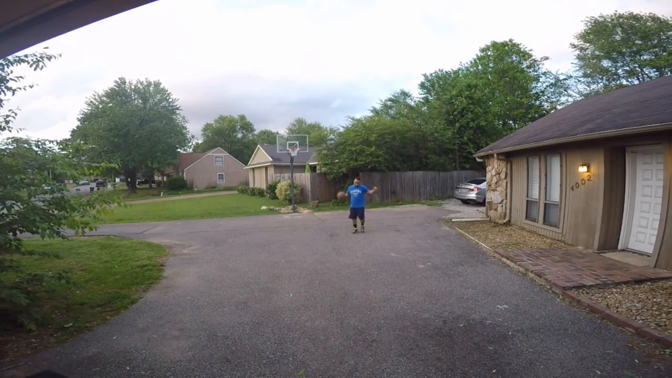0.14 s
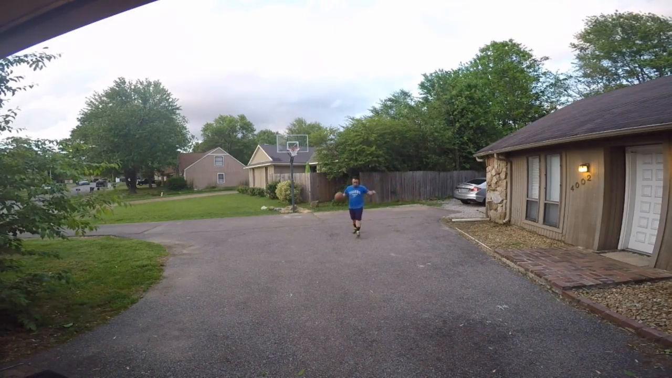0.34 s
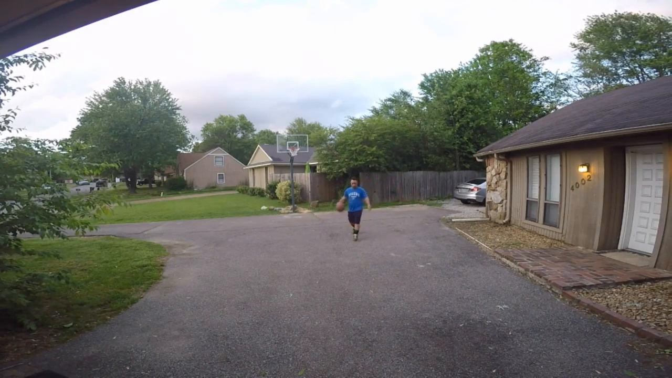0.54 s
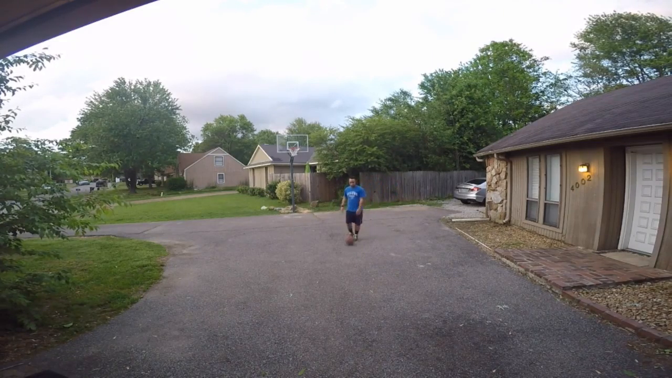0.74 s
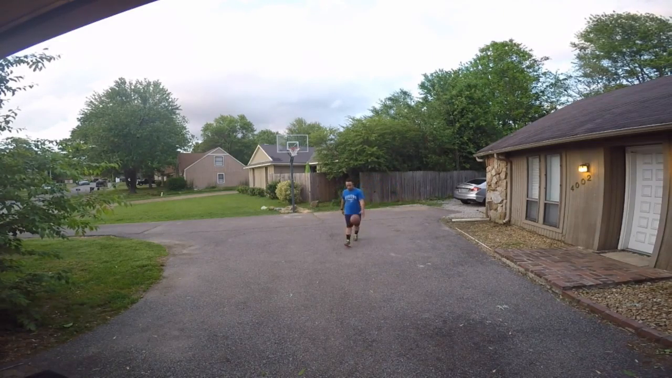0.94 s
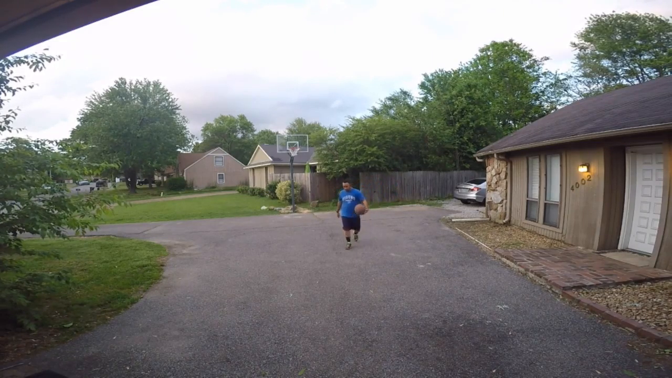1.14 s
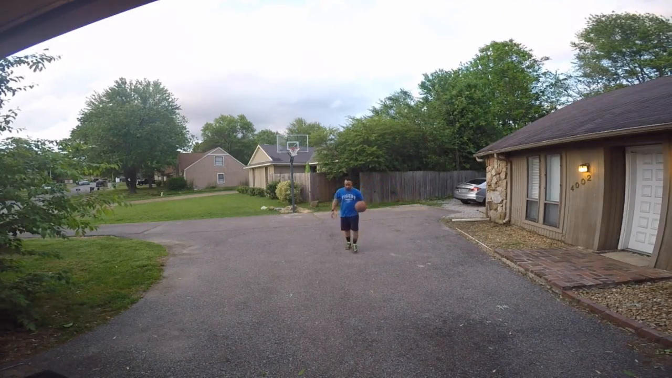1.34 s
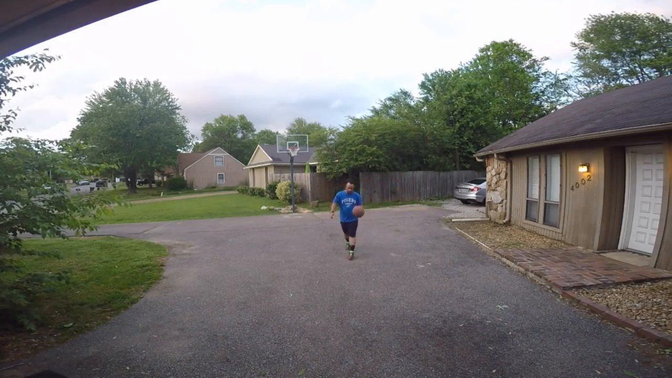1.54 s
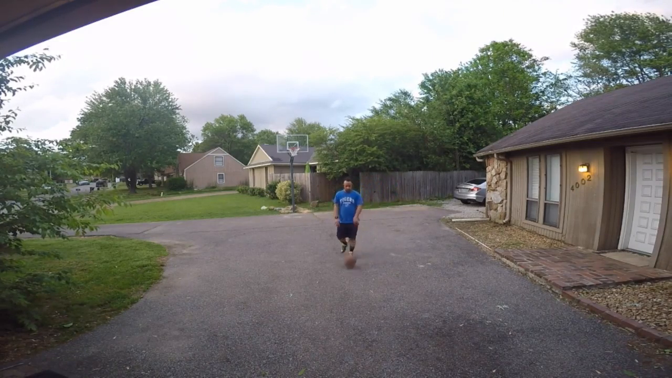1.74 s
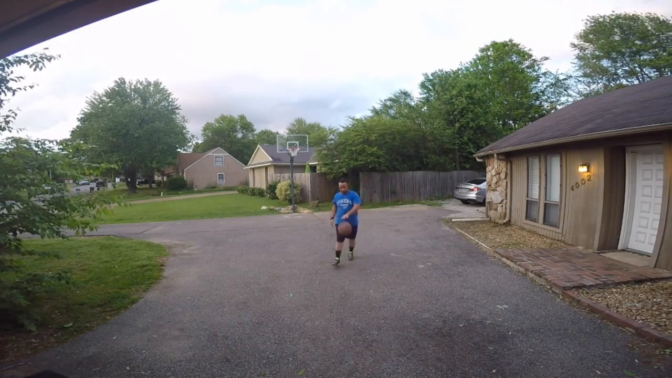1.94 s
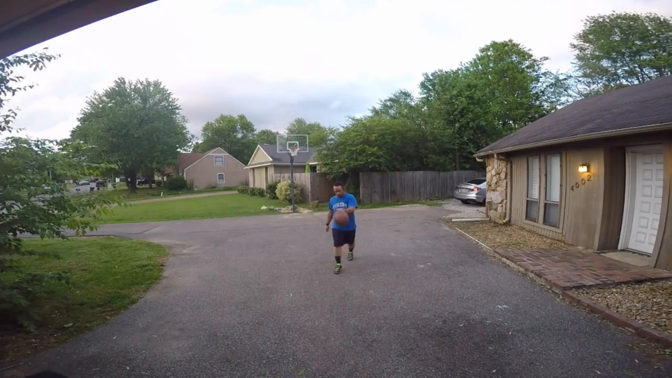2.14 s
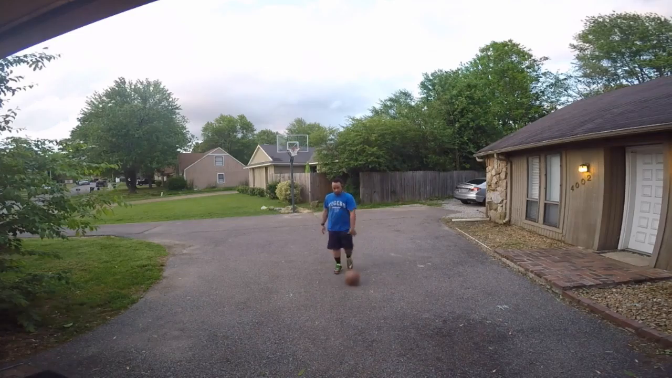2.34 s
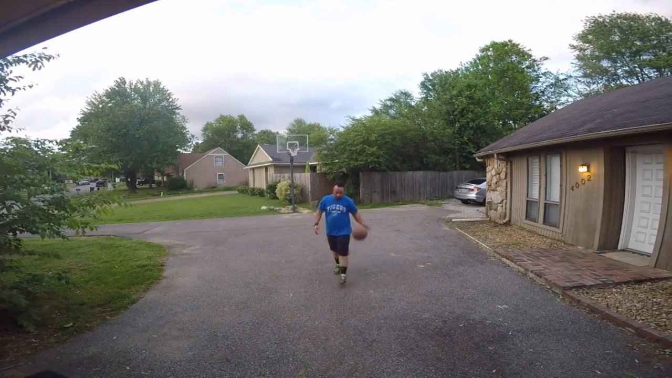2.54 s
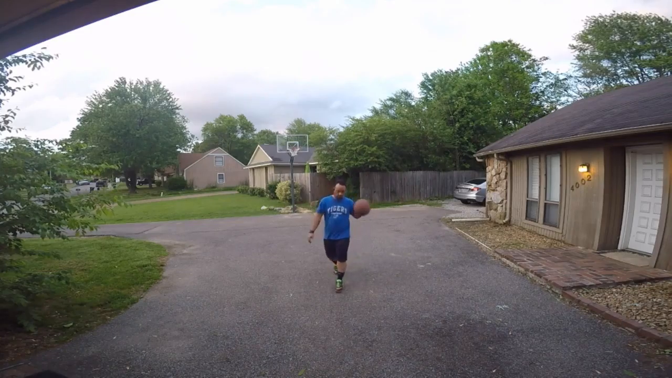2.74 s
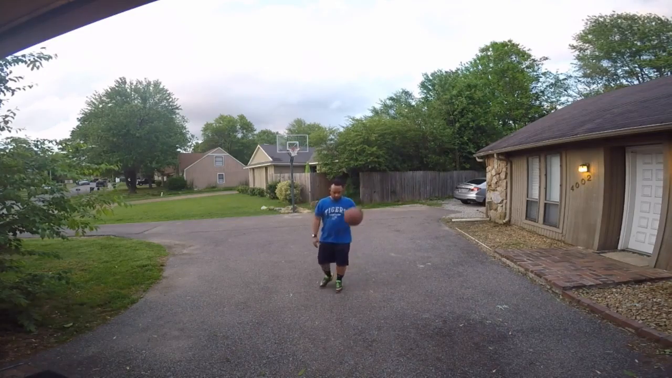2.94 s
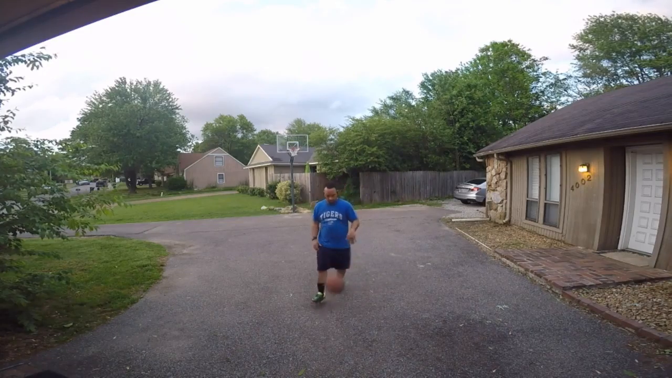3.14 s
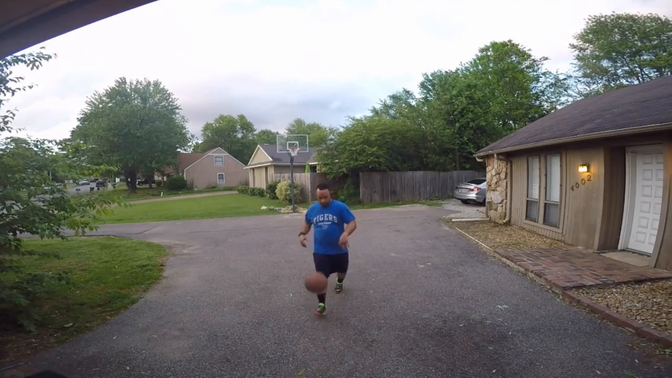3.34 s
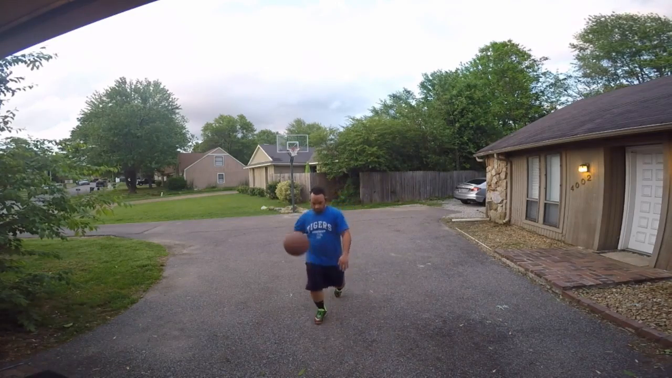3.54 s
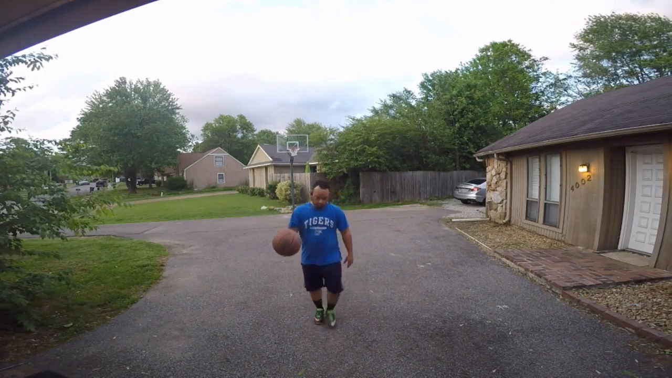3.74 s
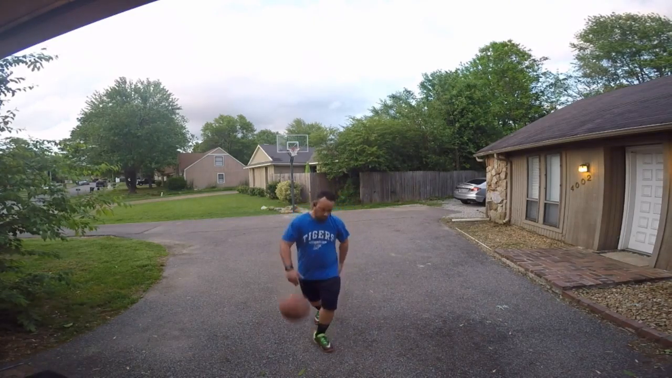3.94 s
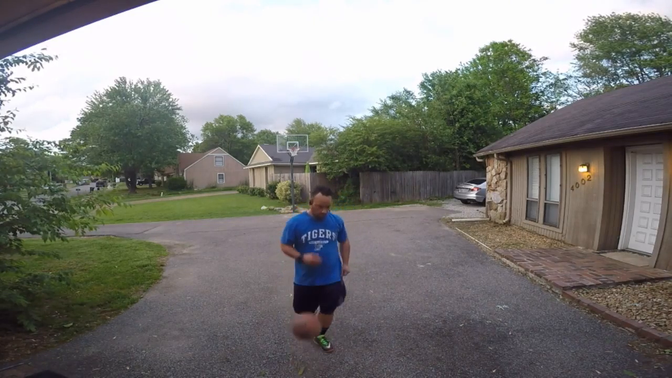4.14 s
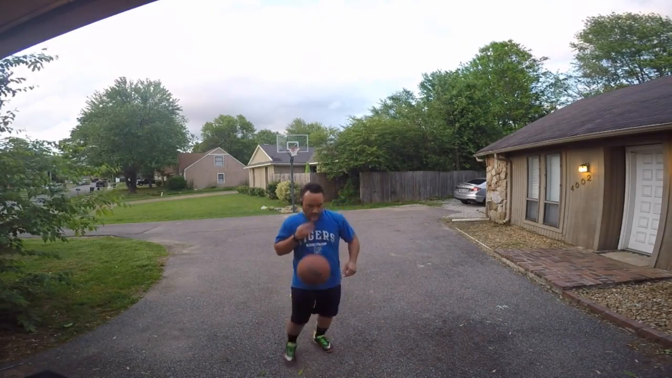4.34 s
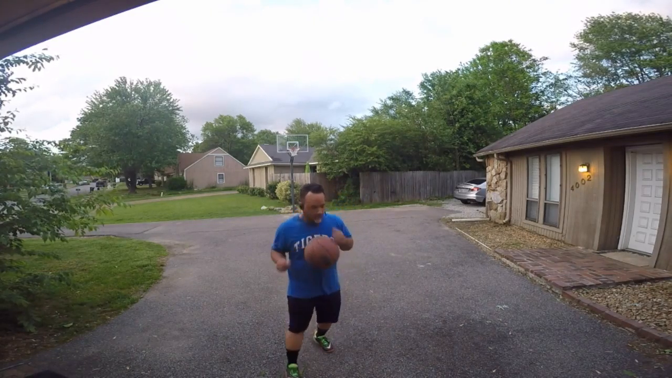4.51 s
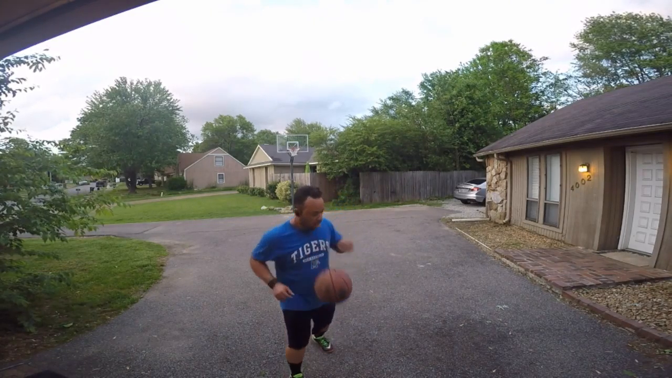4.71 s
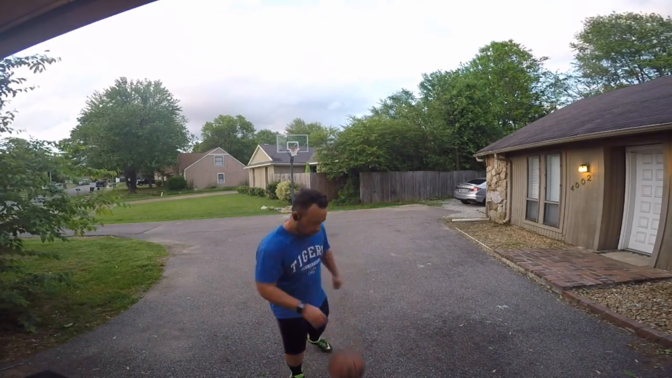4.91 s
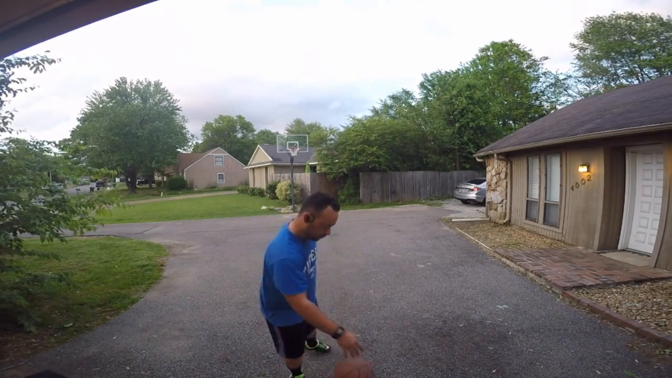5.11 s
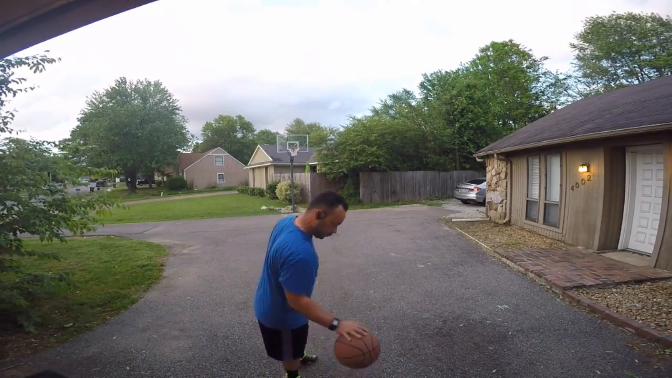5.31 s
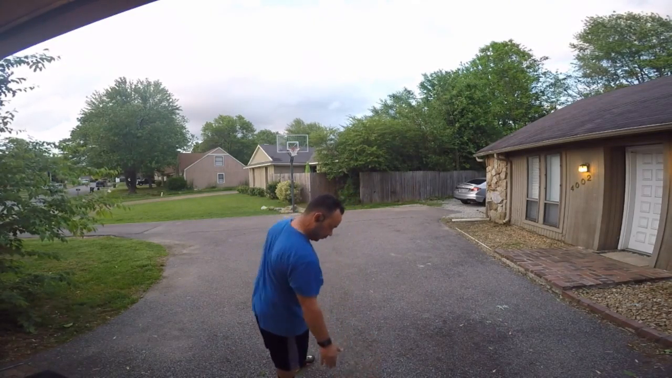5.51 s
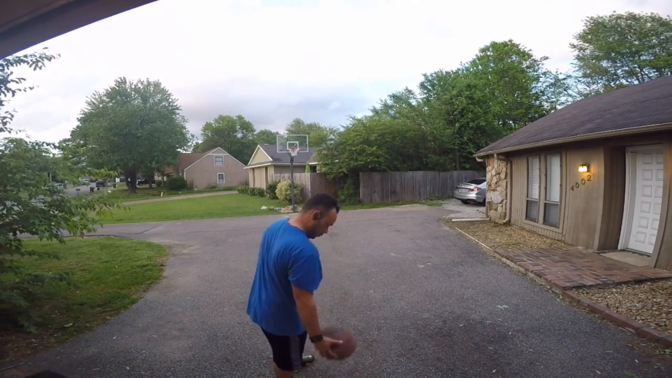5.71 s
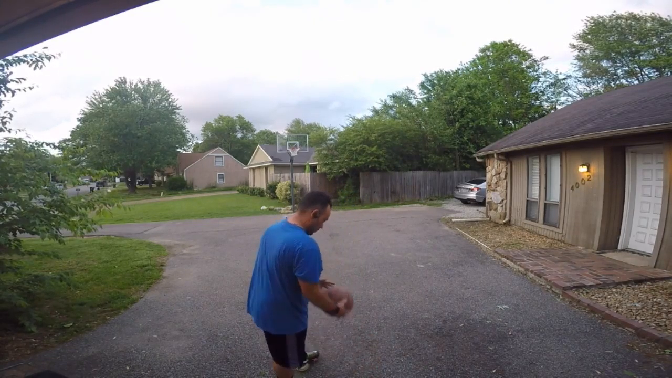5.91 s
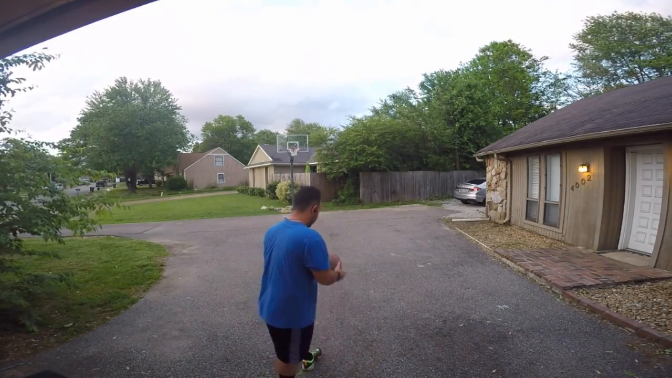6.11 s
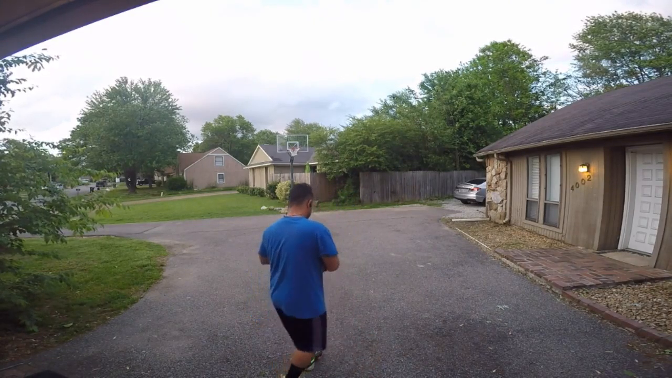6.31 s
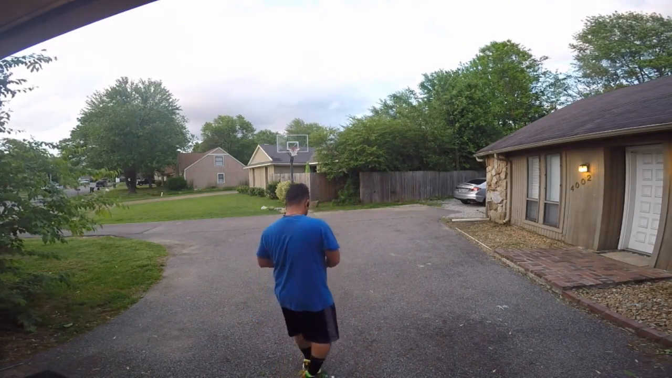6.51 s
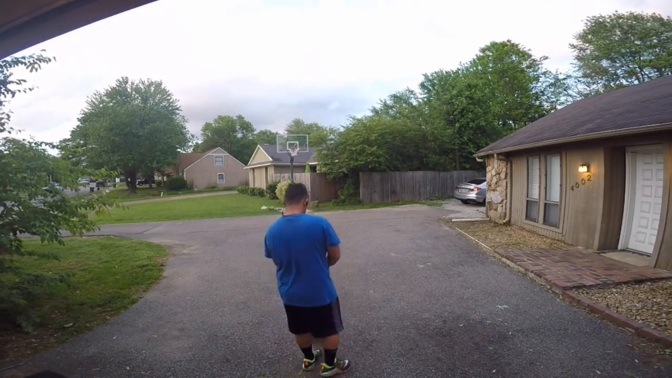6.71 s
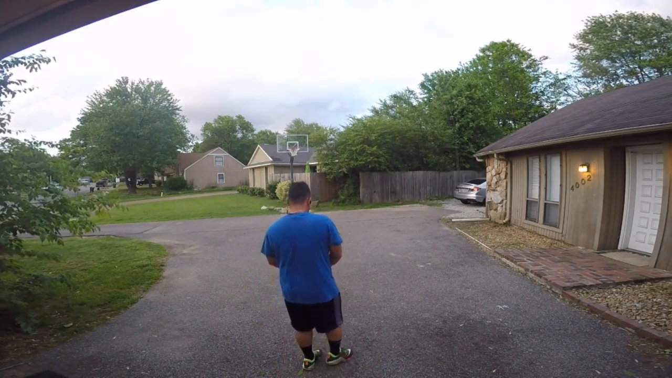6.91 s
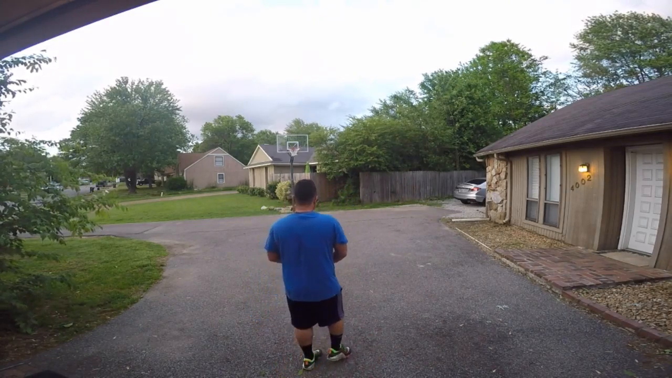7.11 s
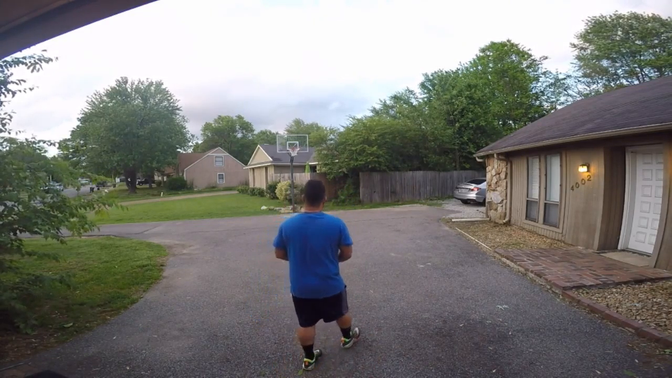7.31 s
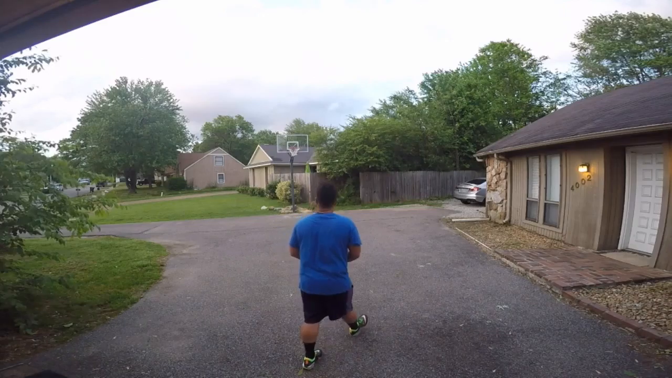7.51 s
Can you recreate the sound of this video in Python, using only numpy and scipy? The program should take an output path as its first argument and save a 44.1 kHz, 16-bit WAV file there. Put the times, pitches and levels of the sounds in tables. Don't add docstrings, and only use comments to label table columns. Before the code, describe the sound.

A quiet driveway between houses, heard through a small housed microphone with a boxy midrange colour. Low traffic and leaf murmur sways throughout, with faint hiss. A light tap comes at 0.26 s, then a dull, distant basketball bounce at 0.8. A medium slap lands at 1.8, the loudest at 2.4, a gritty medium one at 3.3, and a loud one at 4.1. At 5.1 the bounce is loud, bright and gritty; at 5.6 it is weak. Each gives a very short skin ring, a hollow air ring, a low push booming in door panels, and quick echoes decaying around the yard. Small shoe taps fall between, with a sole drag at 5.4 and shuffles around 6.0 to 6.6. A high insect ticks in short bursts until about 6.2; faint birds call near 2.4, 2.9 and 4.5 to 4.9. A final narrow-toned slap at 6.8 echoes clearly, then a step at 7.0 and fading ambience.

```python
import sys
import numpy as np
from scipy import signal
from scipy.fft import rfft, irfft
from scipy.io import wavfile

SR = 44100
rng = np.random.default_rng(int(sys.argv[2]) if len(sys.argv) > 2 else 0)


def invert_db(level):
    return 10 ** (np.asarray(level, dtype=float) / 20)


def persist_wave(psi):
    counts = np.round(np.clip(psi, -1, 1) * 32767).astype(np.int16)
    wavfile.write(sys.argv[1], SR, np.atleast_2d(counts).T)


N = 337806

# (time
# [s], slap level [dB], centre pitch [Hz], fall [dB per octave], grit level [dB])
BOUNCES = [
    (0.8243, -33.5, 1700, -2.5, -38),
    (1.8289, -20.5, 2170, 10.5, -34.5),
    (2.421, -13.5, 1730, 11.5, -38.5),
    (3.2903, -21, 1920, 7.5, -31.5),
    (4.1205, -15, 2100, 9, -32),
    (5.0642, -15.5, 2960, 8, -31),
    (5.5699, -30.5, 2300, -9, -37.5),
    (6.802, -20, 2780, 29, -33),
]
# (push level [dB], thud level [dB], yard echo under the slap [dB], first wall under the slap [dB])
THUMPS = [(-29.5, -27.5, -16, -18), (-26, -23.5, -21.5, -16.5), (-24, -24.5, -23.5, -19),
          (-24, -24, -21, -23), (-26, -23, -29, -19), (-29.5, -22, -22, -19), (-31, -23.5, -18, -20),
          (-27.5, -23.5, -12.5, -11)]
# (low ring level [dB], low ring [Hz], high ring [Hz], high ring level [dB], crackle level [dB])
SKIN = [(-28, 2023, 3900, -25, -57), (-24, 1920, 2590, -29, -44.5), (-13, 1750, 2770, -17, -46),
        (-21.5, 1850, 3980, -23.5, -43.5), (-16, 1680, 3920, -20, -43.5), (-35, 1800, 3790, -16, -62),
        (-31.5, 1600, 2820, -29, -50), (-25.5, 1300, 3270, -23, -36.5)]
# (lower edge [Hz], upper edge [Hz])
ZONES_HZ = [(1400, 2300), (2150, 3400), (3400, 4700), (4400, 6800), (500, 1450), (6500, 10500)]


def rms_one(x):
    return x / np.sqrt(np.mean(x ** 2) + 1e-20)


def clicks(times, sizes):
    out = np.full(N, 1e-18)
    places = np.minimum((np.asarray(times) * SR).astype(int), N - 1)
    np.add.at(out, places, sizes)
    return out


def fade(x, t60):
    return signal.lfilter([1], [1, -invert_db(-60 / (t60 * SR))], x)


def ring(x, hz, t60):
    r, w = invert_db(-60 / (t60 * SR)), 2 * np.pi * hz / SR
    return signal.lfilter([0, np.sin(w)], [1, -2 * r * np.cos(w), r * r], x)


def resonate(x, peaks):
    out = 0
    for k, (hz, width, level_db) in enumerate(peaks):
        r = np.exp(-np.pi * width / SR)
        b = (1 - r * r) / 2 * np.array([1, 0, -1])
        a = [1, -2 * r * np.cos(2 * np.pi * hz / SR), r * r]
        out = out + (-1) ** k * invert_db(level_db) * signal.lfilter(b, a, x)
    return out


def drift(rate):
    r = np.exp(-40 * np.pi * rate / SR)
    noise = rng.standard_normal(N // 20 + 4002)
    slow = signal.lfilter([1], [1, -2 * r, r * r], noise)[4000:]
    return np.interp(np.arange(N) / 20, np.arange(len(slow)), rms_one(slow))


def hump(level_db, centre_hz, fall_db, zones):
    middle = np.sqrt(np.prod(ZONES_HZ, axis=1))[zones, None]
    return level_db - fall_db * np.abs(np.log2(middle / centre_hz))


def housed(envelopes, strikes, grit_db):
    # (pitch [Hz], width [Hz], level [dB])
    housing = [(1650, 167, -1), (2012, 78, -2), (2480, 485, -3), (2820, 245, 0), (3214, 190, -2.5),
               (3735, 107, 3), (3950, 170, 0.5), (4590, 98, -20), (7200, 790, -23)]
    out = 0
    for zone, envelope, strike in zip(ZONES_HZ, envelopes, strikes):
        grit = rms_one(rng.standard_normal(N) * invert_db(grit_db * rng.standard_normal(N)))
        band = signal.butter(2, zone, "band", fs=SR, output="sos")
        both = signal.sosfilt(band, [grit, grit * envelope + strike])
        leak = invert_db(-17) * signal.lfilter([.3], [1, -.7], both)
        both = resonate(both, housing) + leak
        out = out + both[1] / np.std(both[0])
    return out


def background():
    # (pitch [Hz], level [dB per Hz])
    colour = [(15, -32), (25, 5), (59, 1), (225, -15.5), (1100, -23.5), (1390, -24), (1590, -17.5),
              (1870, -21), (3030, -24.5), (3860, -22.5), (8180, -32.5), (9610, -31), (10400, -33),
              (14000, -33.5), (15200, -35)]
    # (pitch [Hz], width [Hz], level [dB])
    hums = [(64, 21, -70), (9540, 120, -88), (14100, 300, -90)]
    hz = np.maximum(np.fft.rfftfreq(N, 1 / SR), 1)
    point_hz, point_db = np.transpose(colour)
    colour_db = np.interp(np.log(hz), np.log(point_hz), point_db)
    wide = rfft(rng.standard_normal(N)) * invert_db(colour_db)
    low = 1 / (1 + (hz / 150) ** 2)
    lows = irfft(wide * low, N) * invert_db(1.8 * drift(5.7))
    highs = irfft(wide * (1 - low), N) * invert_db(0.26 * drift(1.0))
    out = invert_db(-58.5) * rms_one(lows + highs)
    for hum_hz, width, level_db in hums:
        out = out + invert_db(level_db) * rms_one(resonate(rng.standard_normal(N), [(hum_hz, width, 0)]))
    return out


def birds():
    # (time [s], length [s], pitch [Hz], level [dB])
    notes_sung = [
        (2.39, .1, 10800, -74),
        (2.93, .08, 3800, -70),
        (4.53, .17, 5400, -71.5),
        (4.85, .08, 5300, -70),
    ]
    t, out = np.arange(N) / SR, 0
    for s, length, hz, level_db in notes_sung:
        shape = np.sin(np.pi * np.clip((t - s) / length, 0, 1)) ** .6
        pitch = hz * (1 + .006 * drift(50) - .2 * np.clip(t - s, 0, length))
        out = out + invert_db(level_db) * shape * np.sin(2 * np.pi * np.cumsum(pitch) / SR)
    return out


def insect():
    # (pitch [Hz], width [Hz], level [dB])
    wing = [(6150, 600, 3), (11300, 600, -7), (12950, 300, 0)]
    # (time [s], length [s])
    trills = [(2.535, 0.11), (2.896, 0.065), (3.375, 0.062), (3.869, 0.092), (4.376, 0.066), (4.563, .074),
              (4.878, 0.063), (5.335, .14), (5.883, .061)]
    chirps = [.027, .158, .264, .379, .432, .505, 2.42, 2.665, 2.761, 2.995, 3.128, 3.17, 3.231, 3.461,
              3.57, 3.691, 3.995, 4.256, 4.495, 4.726, 4.97, 5.158, 5.523, 5.628, 5.76, 5.997, 6.101, 6.205]
    chirp_s, burst_db = .031, -72
    t, gate = np.arange(N) / SR, np.zeros(N)
    for s, length in [(s, chirp_s) for s in chirps] + list(trills):
        gate[(t > s + .004) & (t < s + length - .003)] = invert_db(burst_db + 2.0)
    ticks_per_s = 160 * invert_db(2.0 * drift(46))
    tick = np.diff(np.floor(np.cumsum(ticks_per_s) / SR), prepend=0)
    rasp = fade(tick * invert_db(0.74 * drift(150)), 0.019) * rng.standard_normal(N)
    return resonate(gate * rasp, wing) / np.std(resonate(rasp, wing))


def feet():
    # (time [s], level [dB], centre pitch [Hz], fall [dB per octave], t60 [s])
    taps = [(0.0153, -40.5, 2520, 6, 0.026), (0.2595, -28, 2250, 28, 0.036),
            (0.2758, -35.5, 2260, 26, 0.16), (1.6272, -41, 1830, 7, 0.1), (2.012, -43.5, 2700, 30, 0.062),
            (2.142, -45, 1670, 25, 0.048), (2.236, -42.5, 2700, 14, 0.048), (2.708, -47, 3000, 11, 0.12),
            (2.727, -38.5, 3000, 15, 0.035), (2.8466, -46, 2700, 9, 0.059), (3.6077, -41, 2850, 7.5, 0.08),
            (4.0056, -45, 2850, 11, 0.066), (5.3615, -41, 2500, 18, 0.062),
            (5.719, -54.5, 3500, -4.5, 0.08), (6.119, -46.5, 1690, 25, 0.038),
            (6.1704, -39.5, 1580, 11, 0.049), (6.4684, -42, 1680, 28, 0.041), (6.512, -40, 4070, 18, 0.13),
            (6.7446, -46, 2300, 22, 0.08), (6.995, -36, 2000, 8.5, 0.069), (7.016, -47, 1690, 10, 0.24)]
    # (time [s], held for [s], level [dB], relative treble [dB], relative body [dB])
    scuffs = [
        (0.536, 0.05, -64.5, -20, -22),
        (3.96, 0.071, -74, -10, 6),
        (4.85, 0.05, -65, -10, -20),
        (5.362, 0.094, -48, -18, -5),
        (6.485, 0.018, -59, -27, -20),
        (6.512, 0.044, -52, -15.5, -5.5),
        (6.611, 0.077, -60.5, -18, -5.5),
    ]
    # (time [s], level [dB], pitch [Hz], t60 [s])
    pats = [
        (6.003, -53, 430, .035),
        (6.006, -65, 1250, .1),
        (5.3625, -47, 800, .04),
        (3.44, -60, 186, .5),
        (6.172, -58, 1100, .025),
    ]
    sole_db, sole_t60_s = -11.5, 0.03
    rise_db_per_s, fall_db_per_s = 1500, 402
    t, envelopes, strikes = np.arange(N) / SR, np.zeros((6, N)), np.zeros((6, N))
    soles = 0
    for s, level_db, hz, fall_db, t60 in taps:
        sizes = invert_db(hump(level_db, hz, fall_db, slice(None)) - 13.0)
        start = int((s + 0.00049) * SR)
        envelopes[:, start:start + SR // 2] += sizes * invert_db(-60 * t[:SR // 2] / t60)
        strikes[:, start] += invert_db(14) * sizes[:, 0]
        soles = soles + ring(clicks([s + 0.001587], invert_db(level_db + sole_db)), hz, sole_t60_s)
    uneven_db = 3.0 * drift(110)
    for s, hold, level_db, treble_db, body_db in scuffs:
        before, after = np.minimum(t - s, 0), np.maximum(t - s - hold, 0)
        shape_db = rise_db_per_s * before - fall_db_per_s * after
        colour_db = np.array([-5, -6.5, -3.5, treble_db - 3, body_db, treble_db])
        envelopes += invert_db(colour_db)[:, None] * invert_db(level_db + shape_db + uneven_db)
    knocks = sum(ring(clicks([s], invert_db(level_db)), hz, t60) for s, level_db, hz, t60 in pats)
    return housed(envelopes, strikes, grit_db=4.5) + knocks + soles


def boom():
    # (wide door [dB], narrow door [dB], narrow door lag [s])
    doors = [(-37, -46, 0.0092), (-33.5, -37, .0109), (-34.5, -40, 0.0099), (-37, -32, .0075),
             (-39, -28, 0.0075), (-40.5, -29.5, 0.0049), (-41.5, -29, 0.0051), (-40, -34.5, 0.005)]
    s, push_db = np.array(BOUNCES)[:, 0], np.array(THUMPS)[:, 0]
    wide_db, narrow_db, lag = np.transpose(doors)
    wide = ring(clicks(s + 0.0061, invert_db(wide_db)), hz=62.7, t60=0.82)
    narrow = ring(clicks(s + lag, invert_db(narrow_db)), hz=74.6, t60=0.31)
    band = signal.butter(3, [85, 270], "band", fs=SR, output="sos")
    rumble = rms_one(signal.sosfilt(band, rng.standard_normal(N)))
    swell = fade(clicks(s + 0.011, invert_db(push_db - 23)), t60=0.58)
    swell = signal.lfilter([.005], [1, -.995], swell)
    return narrow - wide + swell * rumble


def skin():
    out = 0
    for (s, *_), (low_db, low_hz, high_hz, high_db, _) in zip(BOUNCES, SKIN):
        out = out + ring(clicks([s + .0008], invert_db(low_db + 3)), low_hz, t60=.032)
        out = out - ring(clicks([s + .0010], invert_db(high_db)), high_hz, t60=.032)
    return signal.sosfilt(signal.butter(2, [1150, 6000], "band", fs=SR, output="sos"), out)


def ball_modes():
    # (pitch [Hz], level [dB], t60 [s])
    push = [(248, 0, .05), (112, -1, .065), (455, -19, .09)]
    # (pitch [Hz], level under the slap [dB], t60 [s])
    air = [(1245, -27, .2), (1570, -31, .2), (1955, -28, .2), (2310, -31, .25), (2700, -30, .25),
           (3290, -34, .22), (3715, -30, .3), (4020, -30, .25)]
    long_ring_db = [-65, -68, -65, -62, -56, -56, -63, -72]
    s, slap_db, centre_hz, fall_db, _ = np.transpose(BOUNCES)
    slap_db = hump(slap_db, centre_hz, fall_db, slice(3)).mean(axis=0)
    push_db = np.array(THUMPS)[:, 0]
    chance = rng.standard_normal((len(s), 16))
    out = 0
    for k, (hz, level_db, t60) in enumerate(push):
        blow = clicks(s + .002 + .002 * k, invert_db(push_db + level_db + .8 * chance[:, k]))
        out = out - (-1) ** k * ring(blow, hz, t60)
    out = signal.sosfilt(signal.butter(2, 600, fs=SR, output="sos"), out)
    for k, (hz, level_db, t60) in enumerate(air):
        blow = clicks(s + .002, invert_db(slap_db + level_db + 3.0 * chance[:, 4 + k]))
        out = out + invert_db(3.5 * drift(40)) * ring(blow, hz, t60)
    long_ring = ring(clicks(s + .002, invert_db(np.array(long_ring_db))), hz=2843, t60=1.15)
    return out + invert_db(3.5 * drift(30)) * long_ring


def slaps():
    # (delay [s], level [dB], t60 [s])
    echoes = [(0.032, -36.5, 0.19), (0.076, -40, 0.23), (.19, -48.5, .15)]
    s, slap_db, hz, fall_db, grit_db = np.transpose(BOUNCES)
    _, thud_db, yard_db, wall_db = np.transpose(THUMPS)
    crackle_db = np.array(SKIN)[:, 4]
    levels_db = [*hump(slap_db, hz, fall_db, slice(3)), grit_db, thud_db, crackle_db]
    decays = [(0.077, 1.0), (0.097, 0.73), (0.024, 0.67), (0.11, 1.0), (0.16, 0.37), (0.03, 0.52)]
    s = s + .0006
    envelopes, strikes = [], []
    for zone_db, (near_t60, far_t60) in zip(levels_db, decays):
        strikes.append(clicks(s, invert_db(zone_db + 4)))
        smack = fade(clicks(s, invert_db(zone_db - 3.0)), t60=0.03)
        walls = fade(clicks(s + 0.016, invert_db(zone_db + wall_db)), t60=0.036)
        for delay, level_db, t60 in echoes:
            walls = walls + fade(clicks(s + delay, invert_db(zone_db + level_db)), t60)
        walls = signal.lfilter([.01], [1, -.99], walls)
        back = clicks(s + 0.006, invert_db(zone_db + yard_db))
        yard = fade(back, near_t60) + invert_db(-16) * fade(back, far_t60)
        lumps = invert_db(4.3 * drift(45) - 1)
        envelopes.append(smack + walls + lumps * yard)
    return housed(envelopes, strikes, grit_db=4.5)


def scene():
    surroundings = background() + birds() + insect() + feet()
    ball = boom() + skin() + ball_modes() + slaps()
    return (surroundings + ball)[None]


def band_limit(x):
    return signal.sosfilt(signal.butter(12, 15310, fs=SR, output="sos"), x)


def record(dry):
    cut = signal.sosfilt(signal.cheby2(14, 70, 16000, fs=SR, output="sos"), dry)
    return band_limit(cut)


dry = scene()
out = record(dry)
persist_wave(out)
```